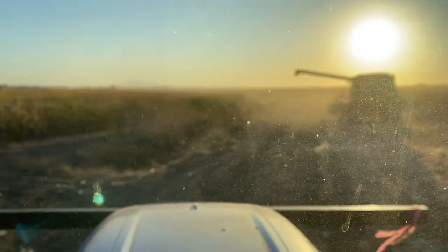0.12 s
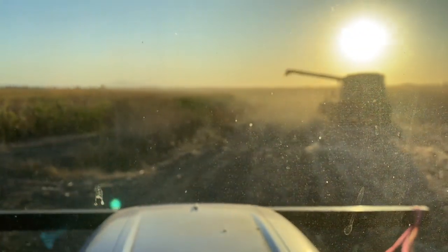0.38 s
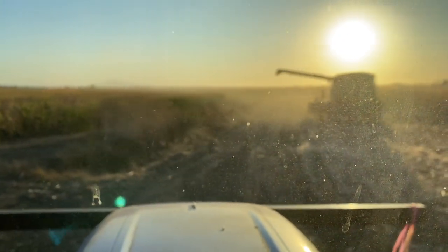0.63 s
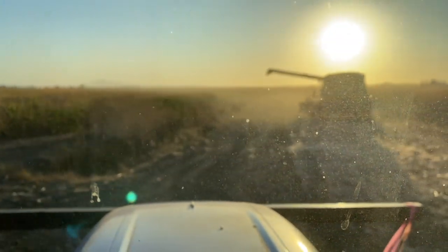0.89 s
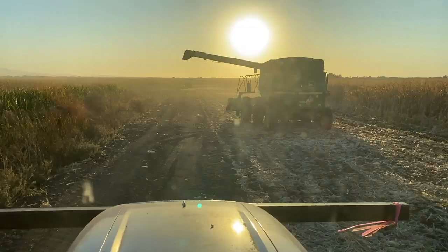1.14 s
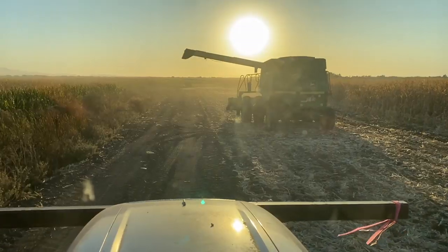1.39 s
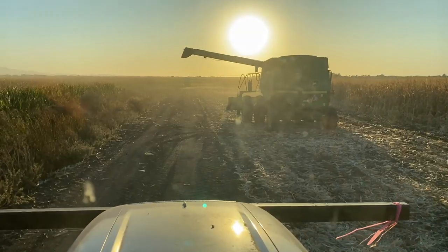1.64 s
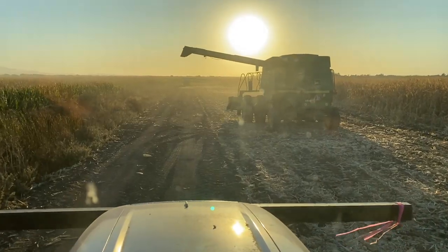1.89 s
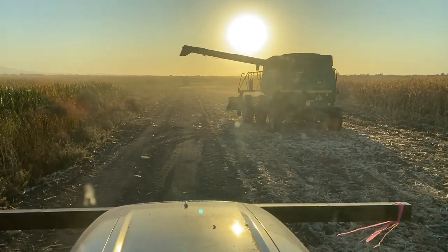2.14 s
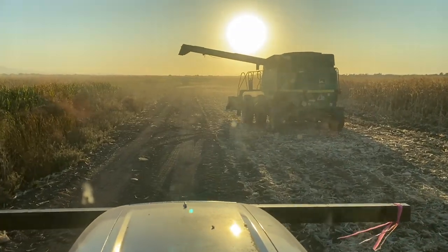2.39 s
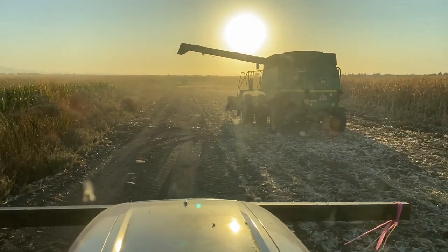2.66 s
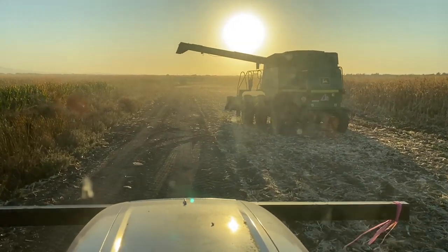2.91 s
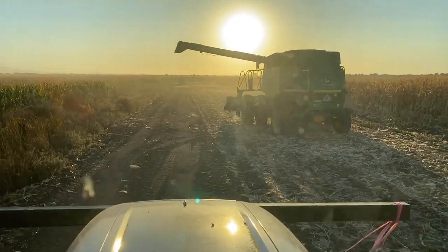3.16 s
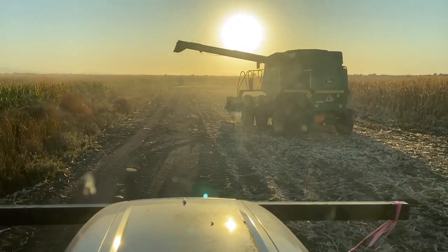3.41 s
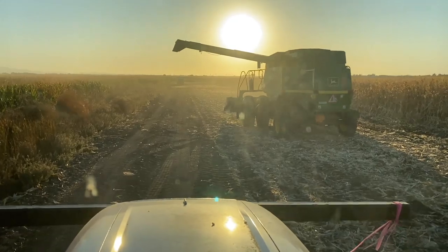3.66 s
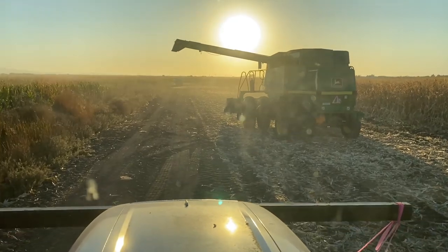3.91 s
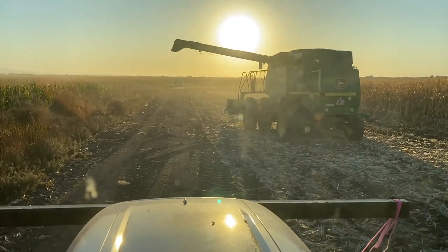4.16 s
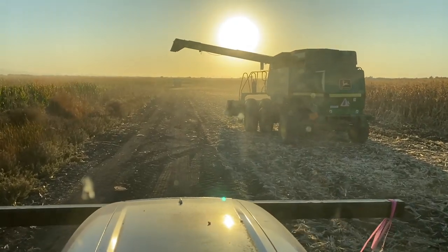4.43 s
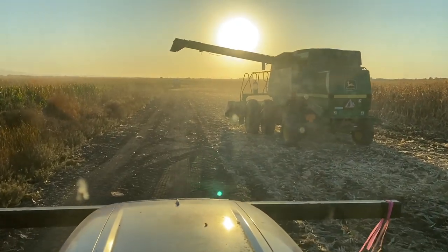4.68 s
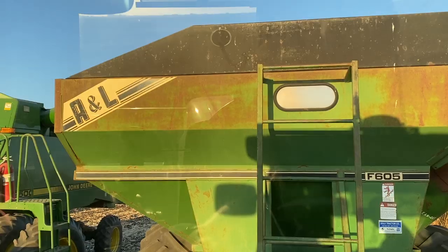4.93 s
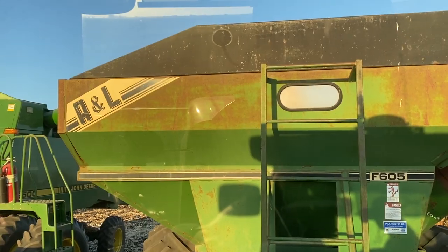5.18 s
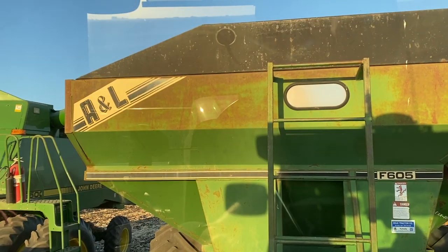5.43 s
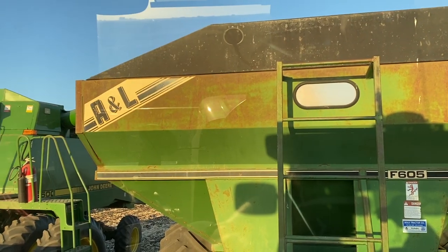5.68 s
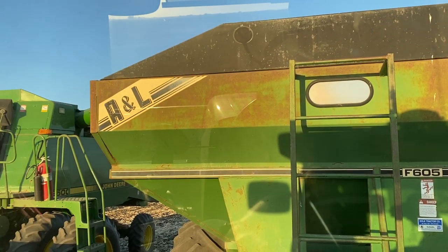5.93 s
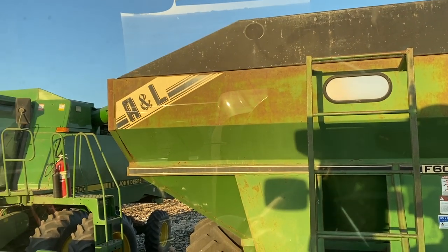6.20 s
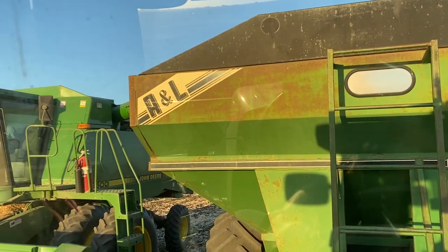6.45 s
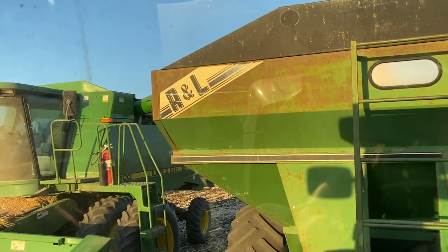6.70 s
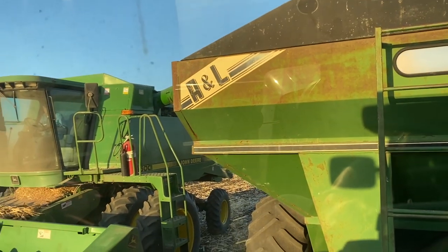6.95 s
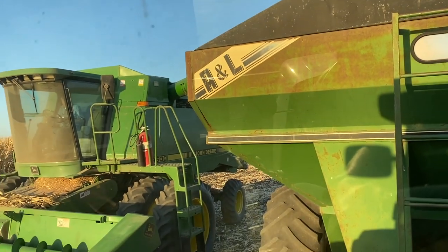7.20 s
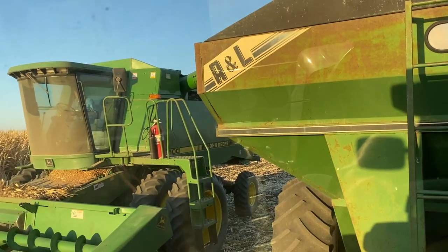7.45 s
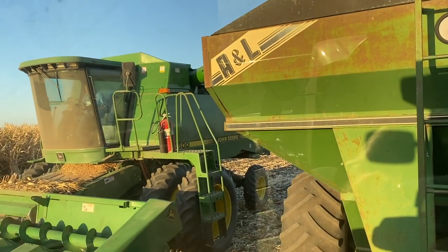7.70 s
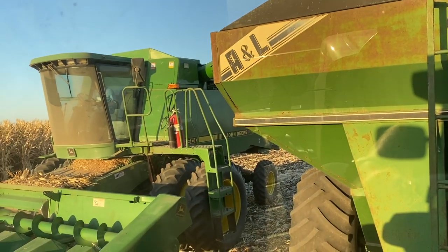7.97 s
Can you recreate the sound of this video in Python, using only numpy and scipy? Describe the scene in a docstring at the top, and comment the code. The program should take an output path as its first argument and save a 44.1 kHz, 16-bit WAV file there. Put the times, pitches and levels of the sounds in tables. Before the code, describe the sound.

Inside a tractor cab, a diesel revs up, then abruptly pulls under load with gear whine, then drops to a humming, throbbing idle beside another machine.

```python
"""Tractor cab, three stretches

Two microphones inside the cab: a six-cylinder diesel revs up from idle; a hard cut, and it pulls under load with
a gear whine; another, and it idles beside a second machine whose slower firing beats against it.
Sines locked to the shaft make engine, transmission and pump. Coloured noise makes the roar of body, panels, fan
and blower air; short noise bursts make the loose trim that ticks now and then, and two pulses snap."""
import sys
import numpy as np
from scipy import signal
from scipy.fft import rfft, irfft, next_fast_len
from scipy.io import wavfile
from scipy.ndimage import uniform_filter1d

SR = 44100
rng = np.random.default_rng(int(sys.argv[2]) if len(sys.argv) > 2 else 0)


def transcribe(u):
    """Save the signal u as a 16-bit wav file named by the first command-line argument.

    u: samples, shape (n,) or (channels, n), limited to [-1, 1]; the rate is SR.
    q: integer samples, one column per channel.
    """
    v = np.clip(np.atleast_2d(u).T, -1, 1)
    q = np.round(v * 32767).astype(np.int16)
    wavfile.write(sys.argv[1], SR, q)


def elevation(decibels):
    """Turn decibel levels (scalar or array-like) into linear amplitude ratios."""
    levels = np.asarray(decibels, float)
    return 10 ** (levels / 20)


N = 356548  # samples

# Lists of three hold one entry per stretch: revving, pulling, waiting.
# stretch borders: t/s; fades at both ends of each stretch: length/s
CUTS = (0, 1.1793, 4.8665, 8.1)
FADE_IN = (0.0016, 0.0015, 0.014)
FADE_OUT = (.0015, .0012, .0001)
# crankshaft speed: [t/s, speed/turns per s]
SHAFT_SPEED = [
    [(0, 14.13), (.3, 14.15), (.4, 14.4), (.55, 15.15), (.75, 16.4), (.95, 17.85), (1.18, 19.0)],
    [(1.18, 23.4), (1.45, 23.6), (1.8, 24.72), (1.95, 25.05), (2.3, 25.53), (2.7, 25.78), (3.1, 26.68),
     (3.3, 26.96), (4.45, 26.94), (4.87, 26.78)],
    [(4.86, 14.18), (8.1, 14.18)],
]
# engine and transmission tones locked to the shaft, before the cab lift:
# [multiple of shaft, level/dB rms, left minus right/dB, left leads/rad]
ENGINE_TONES = [
    [(3, -33.5, -0.5, 0), (6, -39, -0.5, .2), (7.5, -48, 0.5, 0.039), (10.5, -44, -4, 0.44)],
    [(1.5, -43, -2, 0), (2, -44, 1, 0), (3, -40.5, -2, .2), (5, -36.5, -2, -0.28), (6, -38, -0.5, -.3),
     (7, -42, -4, -0.15), (7.5, -42, -2, -.6), (9, -40, 2.5, -.9), (10.75, -44.5, 4, 0.12),
     (13.1, -48, -7, .1), (20.2, -60, -9.5, 1.1), (21.06, -61, 0, .1), (27.3, -63.5, -3.5, -1.5),
     (28.07, -62, -7.5, 0.56)],
    [(3, -36, -1, 0), (4, -46, 3.5, .1), (6, -41.5, -0.5, 0.16), (9, -46, 0.5, .3), (10.5, -42, -1, -0.44),
     (12, -48.5, 6, .1), (13.5, -51, -6, -.3)],
]
# tones of pumps and gears geared to the shaft: same columns
GEAR_TONES = [
    [(28.7, -63.5, 0.0049, .1), (40.1, -60.5, 0, .1)],
    [(14.644, -46, 1, 0.61), (15.7, -44.5, -1, .7), (16.05, -52, 2, 0.48), (26.3, -64, -4, 1),
     (31.54, -58, 5, 1.2), (44.8, -65, -1.5, -1.5), (78.3, -63, 1.5, .1)],
    [(14.31, -39.5, -2, 0.75), (28.65, -57, -2, 0), (31.3, -47.5, -12, -2.4), (43.6, -64, -7, -1.7),
     (51.55, -55, -4, -2.3), (53.7, -57, 2, 0.6), (71.2, -68.5, 3, 1)],
]
# shaft tones held down for a while: [multiple of shaft, from t/s, to t/s, level change/dB]
FAINT_SPELLS = [(3, .55, 1.1, -4), (1.5, 1.1, 2.3, -10), (2, 1.1, 1.9, -6), (3, 1.1, 1.65, -8),
                (3, 3.2, 4.55, -5), (5, 3.25, 4.9, -5), (7, 1.85, 2.85, -12), (7.5, 1.1, 1.65, -10),
                (10.75, 1.1, 1.7, -8), (13.1, 1.1, 2.7, -10), (14.644, 1.1, 3.05, -12),
                (15.7, 1.1, 2.05, -13)]
FAINT_EDGE_S = .12
# cab air modes that colour the shaft tones: [f/Hz, width/Hz, lift/dB]
CAB_MODES = [(77.2, 5.4, 7.5), (130.2, 9, 6), (142.4, 4.1, 8), (159, 4.6, 9), (185.5, 10.6, 9),
             (331, 12, -7), (392.8, 11, 5), (630, 20, 7)]
CAB_SHARE = 0.32  # part of each mode's dB that also lifts the rumble

# pump tone: plain level/dB rms in the first two stretches
PUMP_LEVEL = (-34., -57.)
# pipework resonances that the pump tone passes: [f/Hz, width/Hz, lift/dB]
PIPEWORK_RINGS = [(201, 16, 6.5), (207.5, 5, -7), (215, 8, 12.5), (229, 30, 7), (345, 24, 20),
                  (385, 22, 11.5)]
PUMP_ORDER, WHINE_ORDER, MESH_ORDER = 14.34, 24.87, 39.85  # cycles per shaft turn
PUMP_DIP_S = .145  # pump and hum stand in opposite phase here
# gear whine: rises to its level, then dips briefly
WHINE_DB, WHINE_IN_S, WHINE_RISE_DB_PER_S = -45., 1.95, 25.
WHINE_GAP_S, WHINE_GAP_LENGTH_S, WHINE_GAP_DB = 2.72, 0.13, -12
# gear mesh: louder while the shaft gains speed
MESH_DB, MESH_DB_PER_TURN_S2, MESH_SMOOTH_S = -65, 4.5, .3
# a rising tone that swells and dies away
TAKE_UP_S, TAKE_UP_HZ, TAKE_UP_HZ_PER_S, TAKE_UP_DB, TAKE_UP_WIDTH_S = 1.9, 477., 15., -39., .33

# neighbour's engine, firing and four and a half times that: [f/Hz, level/dB rms, left minus right/dB, left leads/rad]
NEIGHBOUR_TONES = [(39.0, -36.5, 1, 0), (175.3, -42, -3.5, 0)]
BEAT_DIP_S = 6.4  # both firings stand in opposite phase here
HUM_HZ, HUM_OCTAVE_DB = 219.6, -20.5  # octave relative to the hum
HUM_IDLE_DB, HUM_REV_DB, HUM_FALL_S, HUM_FALL_LENGTH_S = -28.5, -37, .36, 0.1
# hum at rest, before its waver: [t/s, level/dB rms]
REST_HUM = [(4.87, -31.5), (5.4, -35), (6.2, -34.5), (6.5, -32), (6.8, -35), (7.05, -46), (7.35, -35),
            (7.8, -28.5), (8.08, -30)]
HUM_WAVER_DB = -0.5
# seat and floor boom at rest, before its throb: [t/s, level/dB rms]
BOOM_LEVEL = [(4.87, -37), (5.6, -36), (5.69, -27.5), (6.05, -29), (6.25, -37.5), (6.55, -46), (6.7, -32),
              (7.2, -28), (8.08, -30)]
# boom spectrum: [f/Hz, relative level/dB per Hz]
BOOM_COLOUR = [(70, -30.5), (86, -7), (100, -1), (110, -5), (135, -43)]
THROB_HZ, THROB_DB, THROB_PEAK_S = 3.12, 2.5, 7.08

# roar spectra, body rumble and panels by stretch, blower air and fan for all: [f/Hz, relative level/dB per Hz]
RUMBLE_COLOUR = [
    [(20, -38.5), (40, -11.5), (70, -4.5), (110, -1.5), (160, -4), (205, -2.5), (260, -2.5), (340, -13),
     (410, -12), (550, -24), (750, -25.5), (950, -38)],
    [(21, -30), (35, -16), (61, -8), (120, -4), (168, -2), (257, -5.5), (322, -14), (372, -19.5),
     (398, -10), (430, -16), (559, -29.5), (602, -22.5), (649, -26), (700, -20), (910, -39.5), (1540, -120)],
    [(21, -33), (35, -14.5), (97, 0), (162, -6.5), (210, -4), (318, -12.5), (393, -18.5), (446, -15),
     (566, -21.5), (700, -27), (910, -35), (1540, -120)],
]
PANEL_COLOUR = [
    [(290, -39), (500, -14.5), (547, -21.5), (689, -1), (801, -19), (1130, -8), (1460, -14), (1590, -15),
     (2040, -12), (3260, -22), (3610, -26), (5500, -32), (7150, -67), (12100, -120)],
    [(290, -27.5), (500, 2.5), (570, -13.5), (656, -4), (895, -11.5), (941, -11), (1100, -9.5),
     (1790, -13.5), (2040, -12), (2420, -11), (3650, -24), (4730, -26.5), (5500, -30), (7150, -61.5),
     (12100, -120)],
    [(290, -19), (500, -22), (630, -18), (682, -13), (747, -3), (809, -11.5), (1070, -13), (1260, -12),
     (1420, -16), (1810, -13), (2160, -14), (3140, -23), (5500, -29.5), (7150, -70), (12100, -120)],
]
AIR_COLOUR = [(4500, -22), (6500, 2.5), (8000, 3), (11000, 1.5), (13000, 0), (15400, -6), (15850, -41)]
FAN_COLOUR = [(4300, -27), (5600, 5), (7000, -3), (8300, -11.5), (10000, -28)]
# stereo width of the roar: [f/Hz, side minus mid/dB]
ROAR_WIDTH = [
    [(60, -18.5), (110, -15), (200, 0.5), (380, -5.5), (700, 2.5), (1290, 2.5), (2380, -1), (4400, -4.5),
     (8120, -6.5), (15000, 1)],
    [(60, -13.5), (110, -15), (200, -3), (380, -3.5), (700, 2), (1290, 4.5), (2380, -2), (4400, -3.5),
     (8120, -0.5), (15000, 0)],
    [(60, -25), (110, -28), (200, -9), (380, -7.5), (700, -0.5), (1290, 0.5), (2380, -1), (4400, -2.5),
     (8120, 2.5), (15000, 9)],
]
# side signal that is the mid a quarter cycle behind: [f/Hz, share]
LATE_SHARE = [(250, 0.), (600, .5), (900, .5), (1400, 0.), (2000, -.45), (2800, -.3), (4500, 0.34)]
# glass and panel resonances, in all stretches and in one only: [f/Hz, width/Hz, lift/dB]
PANEL_RINGS = [(792, 40, 0), (958, 32, 3), (1164, 76, 4), (1180, 51, -3.5), (1308, 92, 3.5),
               (1457, 23, 6.5), (1787, 80, -3.5), (2121, 31, 8.5), (2150, 70, -4), (2250, 21, -4),
               (2410, 200, 2), (2634, 60, 3.5), (2860, 150, 1.5), (3060, 100, -1.5), (4770, 610, 2.5),
               (6660, 30, 7)]
STRETCH_RINGS = [
    [],
    [(714, 20, -10.5), (760, 24, 4), (910, 43, -3.5), (978, 20, 5.5), (1140, 55, 3), (1353, 23, 3),
     (1984, 55, 4), (2080, 49, 1), (2170, 18, 5.5), (2540, 16, 5), (2820, 50, 3)],
    [(1245, 36, 5.5), (1290, 60, -0.5), (1160, 27, 1.5), (1860, 83, -4.5)],
]
SMALL_RING_DB, SMALL_RING_WIDTH_HZ = 2., 18
# rumble by stretch: level/dB, and depth of its firing pulse as a fraction
RUMBLE_LEVEL = (-30.5, -29, -31.5)
RUMBLE_PULSE_DEPTH = (0.052, 0.17, 0.046)
PANEL_DB, PANEL_DB_PER_OCTAVE = (-46.5, -42.5, -46.5), 4.5  # at the first speed of a stretch; per doubling of it
PATCH_DB, PATCH_RATE_HZ = 1.4, 12.
# fan by stretch: level relative to the panels/dB; blower air by stretch: level/dB
FAN_LEVEL = (-23.5, -21.5, -21)
AIR_LEVEL = (-78, -76.5, -70)
AIR_DRIFT_DB = .4

# trim rattles: [t/s, strength before shaping/dB, decay by 60 dB/s, treble tilt/dB per octave]
TRIM_TICKS = [(0.072, -42.5, .03, -11), (.43, -52, .04, 8), (.825, -45.5, 0.25, -6),
              (0.9037, -37.5, .05, -4.5), (1.485, -39, 0.055, -2), (2.298, -59, 0.033, -5),
              (2.68, -49, 0.057, 1.5), (4.332, -42.5, 0.14, -9.5), (4.3763, -41.5, .03, -12),
              (4.46, -42.5, 0.045, -13), (5.064, -38.5, 0.059, -1)]
# dry snaps, the first at a cut: [t/s, peak level/dB, treble tilt/dB per octave]
DRY_SNAPS = [(1.1793, -28.5, -6.3), (3.7017, -28., -10.)]
# colour difference of the two channels: [f/Hz, left minus right/dB]
CHANNEL_LEAN = [(60, 1.5), (110, -1.5), (200, 0), (380, 0), (700, 1.5), (1290, -0.5), (2380, 0.5),
                (4400, 3), (8120, -0.5), (15000, -0.5)]
SIDES = np.array([[.5], [-.5]])  # left and right share of a difference between them
# phase difference of the treble: its slope over frequency, and where it is zero
PHASE_SLOPE_S, IN_PHASE_HZ = .000244, 7050
LOW_CUT_HZ = 35


def curve(t, table):
    """Columns of a time table at the times t."""
    s, *columns = np.transpose(table)
    return np.array([np.interp(t, s, c) for c in columns])


def colour(hz, table):
    """Second column of a frequency table, straight on a log frequency axis."""
    f, value = np.transpose(table)
    return np.interp(np.log(hz + 1), np.log(f + 1), value)


def resonance_db(hz, modes):
    """Summed lift in dB of bell-shaped resonances at the frequencies hz."""
    return sum(lift / (1 + (2 * (hz - f) / width) ** 2) for f, width, lift in modes)


def walk(n, rate):
    """Random levels held for 1 / rate seconds and smoothed twice; spread near 1."""
    hold = int(SR / rate)
    steps = np.repeat(rng.standard_normal(n // hold + 1), hold)
    return 1.27 * uniform_filter1d(uniform_filter1d(steps, hold), hold)[:n]


def hiss(n, table, width, lo_hz, hi_hz, rings=()):
    """Stereo noise of a colour, lifted at resonances; the mid has rms 1 between lo and hi."""
    m = next_fast_len(n)
    hz = np.fft.rfftfreq(m, 1 / SR)
    in_table = (hz > table[0][0]) & (hz < table[-1][0])
    gain = elevation(colour(hz, table) + resonance_db(hz, rings)) * in_table
    reference = gain[(hz > lo_hz) & (hz < hi_hz)]
    gain = gain / np.sqrt(np.sum(reference ** 2) / len(hz))
    mid, side = rfft(rng.standard_normal((2, m))) * gain
    late = colour(hz, LATE_SHARE)
    side = np.sqrt(1 - late ** 2) * side - 1j * late * mid  # -1j is a quarter cycle behind
    side = side * elevation(colour(hz, width))
    return irfft(np.array([mid + side, mid - side]), m)[:, :n]


def tone(turns, db, pan_db=0., lead=0.):
    """A sine on a running phase, set between the two channels by level and phase."""
    phase = 2 * np.pi * turns + lead * SIDES
    return np.sqrt(2) * elevation(db + pan_db * SIDES) * np.sin(phase)


def speed_of(turns):
    """Turns per second of a running count of turns."""
    return np.gradient(turns) * SR


def faint_db(t, order):
    """Level change in dB of a shaft tone over its faint spells, with sloping edges."""
    return sum(db * np.clip(np.minimum(t - start, end - t) / FAINT_EDGE_S + .5, 0, 1)
               for o, start, end, db in FAINT_SPELLS if o == order)


def engine(t, k):
    """Engine, transmission and gear tones follow the shaft and change level as they pass the cab modes."""
    speed = curve(t, SHAFT_SPEED[k])[0]
    turns = np.cumsum(speed) / SR
    out = 0
    for order, db, pan_db, lead in ENGINE_TONES[k]:
        # three firings per turn: this phase is zero at the beat's dip
        start = -order * np.interp(BEAT_DIP_S, t, turns) if order == 3 else rng.random()
        waver_db = min(0.24 + 0.34 * order, 1.) * walk(len(t), 2.95)
        level_db = db + faint_db(t, order) + resonance_db(order * speed, CAB_MODES) + waver_db
        out = out + tone(order * turns + start, level_db, pan_db, lead)
    for order, db, pan_db, lead in GEAR_TONES[k]:
        unsteady = order * (turns + .004 * walk(len(t), 5.)) + rng.random()
        waver_db = 1.3 * walk(len(t), 7.)
        level_db = db + faint_db(t, order) + resonance_db(order * speed, CAB_MODES) + waver_db
        out = out + tone(unsteady, level_db, pan_db, lead)
    return out, turns


def pump_level(turns, k):
    """Level in dB of the pump tone as its pitch meets the pipework resonances."""
    return PUMP_LEVEL[k] + resonance_db(PUMP_ORDER * speed_of(turns), PIPEWORK_RINGS)


def revving(t, turns):
    """The pump tone climbs with the shaft past a steady hum, which steps down early on."""
    pump = PUMP_ORDER * (turns - np.interp(PUMP_DIP_S, t, turns))
    hum_db = np.interp(t, [HUM_FALL_S, HUM_FALL_S + HUM_FALL_LENGTH_S], [HUM_IDLE_DB, HUM_REV_DB])
    half_cycle_s = .5 / HUM_HZ
    return tone(pump, pump_level(turns, k=0), .5, -0.2) + hum(t - PUMP_DIP_S + half_cycle_s, hum_db)


def gear_whine(t, turns):
    """A shaft-locked tone that rises to its level and dips briefly."""
    rise_db = WHINE_RISE_DB_PER_S * np.minimum(t - WHINE_IN_S, 0)
    gap_db = WHINE_GAP_DB * np.exp(-((t - WHINE_GAP_S) / WHINE_GAP_LENGTH_S) ** 2)
    return tone(WHINE_ORDER * turns, WHINE_DB + rise_db + gap_db + 1.0 * walk(len(t), 2.9), 1.9, .05)


def gear_mesh(t, turns):
    """A shaft-locked gear tone, louder as the shaft accelerates."""
    gaining = uniform_filter1d(np.gradient(speed_of(turns)) * SR, int(MESH_SMOOTH_S * SR))
    mesh_db = MESH_DB + MESH_DB_PER_TURN_S2 * gaining
    return tone(MESH_ORDER * turns, mesh_db + 2.0 * walk(len(t), 5.8), 3.5, 1.4)


def take_up(t):
    """A tone of steadily rising pitch that swells and dies away."""
    s = t - TAKE_UP_S
    cycles = TAKE_UP_HZ * s + TAKE_UP_HZ_PER_S * s ** 2 / 2
    return tone(cycles, TAKE_UP_DB - 10 * (s / TAKE_UP_WIDTH_S) ** 2, .5, .1)


def pulling(t, turns):
    """Gear whine, pump and mesh follow the shaft; the take-up tone passes through."""
    pump_db = pump_level(turns, k=1) + 1.1 * walk(len(t), 12.0)
    pump = tone(PUMP_ORDER * turns, pump_db, 1.8, -.2)
    return gear_whine(t, turns) + pump + gear_mesh(t, turns) + take_up(t)


def neighbour(t):
    """The second machine's fixed tones, half a cycle on at the beat's dip."""
    return sum(tone(hz * (t - BEAT_DIP_S) + .5, db + .6 * walk(len(t), 1.5), pan_db, lead)
               for hz, db, pan_db, lead in NEIGHBOUR_TONES)


def boom(t):
    """Seat and floor boom: low noise throbbing a few times a second."""
    throb_db = THROB_DB * np.cos(2 * np.pi * THROB_HZ * (t - THROB_PEAK_S))
    return elevation(curve(t, BOOM_LEVEL)[0] + throb_db) * hiss(len(t), BOOM_COLOUR, ROAR_WIDTH[2], 88, 112)


def waiting(t, turns):
    """The neighbour's idle, the boom and a hum slightly unsteady in level and phase."""
    hum_db = curve(t, REST_HUM)[0] + HUM_WAVER_DB * walk(len(t), 8.0)
    return neighbour(t) + boom(t) + hum(t + 0.00031 * walk(len(t), 5.99), hum_db)


def hum(t, db):
    """A fixed-pitch motor hum with a weak octave."""
    return tone(HUM_HZ * t, db, -1.1, -0.22) + tone(2 * HUM_HZ * t, db + HUM_OCTAVE_DB, -2.0, 0.84)


def rumble(k, turns):
    """Low body noise pulsing at the firing rate and at half of it, coloured by the cab modes."""
    n = len(turns)
    pulse = 1 + RUMBLE_PULSE_DEPTH[k] * (np.cos(2 * np.pi * 3 * turns) + np.cos(np.pi * 3 * turns))
    modes = [(f, width, CAB_SHARE * lift) for f, width, lift in CAB_MODES]
    level = elevation(RUMBLE_LEVEL[k] + 0.47 * walk(n, 3.27))
    return level * pulse * hiss(n, RUMBLE_COLOUR[k], ROAR_WIDTH[k], 89.7, 212, modes)


def patchy(x):
    """Each third of an octave rattles up and down alone; the end bands take all beyond."""
    n = x.shape[1]
    m = next_fast_len(n)
    spectrum = rfft(x, m)
    octaves = np.log2(np.fft.rfftfreq(m, 1 / SR) / 700 + 1e-9)
    band = np.clip(np.round(3 * octaves), 0, 9)
    return sum(elevation(PATCH_DB * walk(n, PATCH_RATE_HZ)) * irfft(spectrum * (band == b), m)[:, :n]
               for b in range(10))


def panels(k, turns, panel_db):
    """Ringing panels as resonant noise, pulsing faintly two and three times a turn."""
    n = len(turns)
    knock = 1 + 0.027 * np.cos(2 * np.pi * 3 * turns) + 0.056 * np.cos(2 * np.pi * 2 * turns)
    # many small parts ring at scattered pitches
    small = [(f, SMALL_RING_WIDTH_HZ, SMALL_RING_DB) for f in 800 * 8 ** rng.random(size=50)]
    rings = PANEL_RINGS + STRETCH_RINGS[k] + small
    noise = patchy(hiss(n, PANEL_COLOUR[k], ROAR_WIDTH[k], 660, 7000, rings))
    return elevation(panel_db + 0.17 * walk(n, 9.8)) * knock * noise


def phase_spread(x):
    """Treble shared by both channels, with a phase difference that changes in proportion to frequency."""
    m = next_fast_len(x.shape[1])
    lead = -2 * np.pi * (np.fft.rfftfreq(m, 1 / SR) - IN_PHASE_HZ) * PHASE_SLOPE_S
    return irfft(rfft(x, m) * np.exp(1j * lead * SIDES), m)[:, :x.shape[1]]


def fan_and_air(k, panel_db):
    """Treble noise shared by both channels: the fan grows with shaft speed, the blower air flutters."""
    n = len(panel_db)
    narrow = [(100, -9.5), (7000, -8.0), (9000, -18.5), (16000, -13.0)]  # [f/Hz, side minus mid/dB]
    fan_db = panel_db + FAN_LEVEL[k] + 0.72 * walk(n, 14.)
    fan = elevation(fan_db) * hiss(n, FAN_COLOUR, narrow, 5000, 8000)
    air_db = AIR_LEVEL[k] + AIR_DRIFT_DB * walk(n, 2.8) + .9 * walk(n, 12.0)
    air = elevation(air_db) * hiss(n, AIR_COLOUR, narrow, 9930, 12370)
    return phase_spread(fan + air)


def roar(k, turns):
    """Body rumble, panels, fan and blower air; panels and fan grow with shaft speed."""
    speed = speed_of(turns)
    panel_db = PANEL_DB[k] + PANEL_DB_PER_OCTAVE * np.log2(speed / speed[0])
    return rumble(k, turns) + panels(k, turns, panel_db) + fan_and_air(k, panel_db)


def ticks():
    """Loose trim: short decaying noise bursts, each with its own treble tilt."""
    out, n = np.zeros((2, N)), 8192
    hz, t = np.fft.rfftfreq(n, 1 / SR), np.arange(n) / SR
    for s, db, t60, tilt_db in TRIM_TICKS:
        both, left, right = rng.standard_normal((3, n))
        noise = both + .2 * np.array([left, right])
        burst = noise * 1000 ** (-t / t60) * np.minimum(t / (.05 * t60), 1)
        tilt = elevation(tilt_db * np.log2(hz / 8000 + 1e-3))
        shape = tilt / (1 + (2500 / (hz + 1)) ** 4) / (1 + (hz / 15600) ** 30)
        i = int(s * SR)
        out[:, i:i + n] += .5 * elevation(db) * irfft(rfft(burst) * shape, n)
    return out


def snaps():
    """Single step-like pulses, the same on both sides."""
    out, hz = np.zeros(N), np.fft.rfftfreq(512, 1 / SR)
    for s, db, tilt_db in DRY_SNAPS:
        shape = elevation(tilt_db * np.log2(hz / 8000 + 1e-2)) / (1 + (1500 / (hz + 1)) ** 2)
        pulse = np.fft.fftshift(irfft(1j * shape))
        i = int(s * SR) - len(pulse) // 2
        out[i:i + len(pulse)] += elevation(db) * pulse / pulse.max()
    return out


def scene():
    """Three stretches set end to end with very short fades, ticks and snaps laid over them."""
    out = phase_spread(ticks()) + snaps()
    for k, extra in enumerate((revving, pulling, waiting)):
        a, b = int(CUTS[k] * SR), min(int(CUTS[k + 1] * SR), N)
        t = np.arange(a, b) / SR
        tones, turns = engine(t, k)
        fade_in = np.minimum((t - t[0]) / FADE_IN[k], 1)
        fade_out = np.minimum((t[-1] - t) / FADE_OUT[k], 1)
        out[:, a:b] += fade_in * fade_out * (tones + extra(t, turns) + roar(k, turns))
    return out


def band_limit(x):
    """A steep low-pass at the top of the band."""
    return signal.sosfilt(signal.butter(12, 16890, fs=SR, output="sos"), x)


def record(dry):
    """The two microphone channels differ a little in colour and lose the deepest bass."""
    m = next_fast_len(N)
    hz = np.fft.rfftfreq(m, 1 / SR)
    lean = elevation(SIDES * colour(hz, CHANNEL_LEAN))
    low_cut = 1 / np.sqrt(1 + (LOW_CUT_HZ / (hz + 1)) ** 10)
    mix = irfft(rfft(dry, m) * lean * low_cut, m)[:, :N]
    return band_limit(mix)


dry = scene()
out = record(dry)
transcribe(out)
```